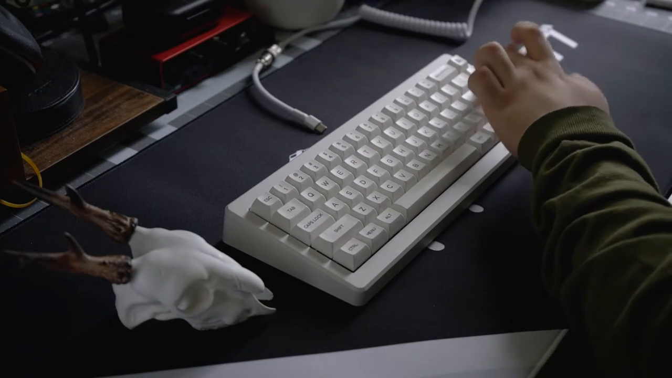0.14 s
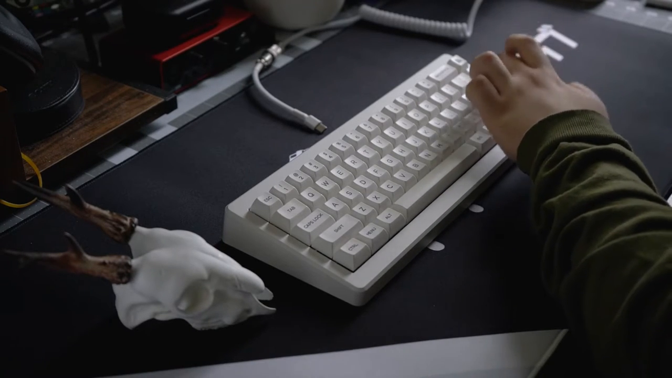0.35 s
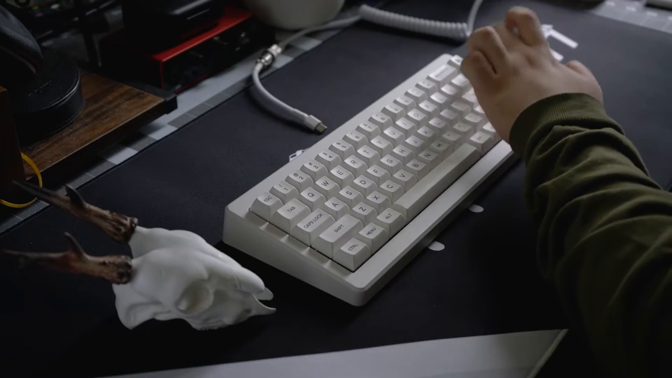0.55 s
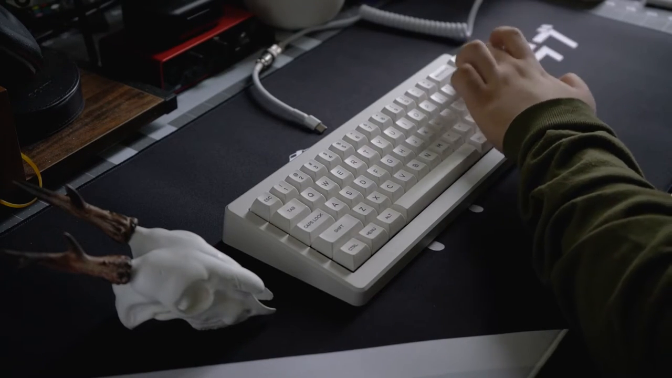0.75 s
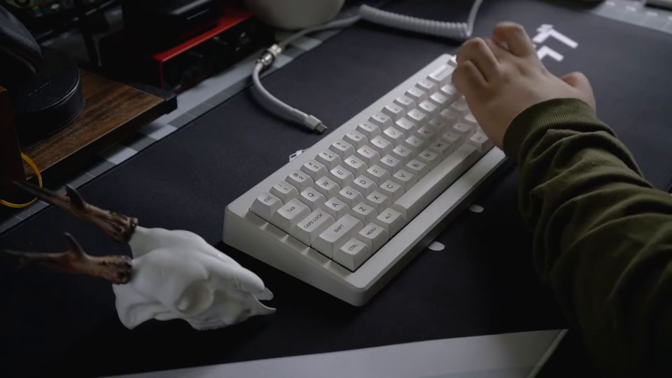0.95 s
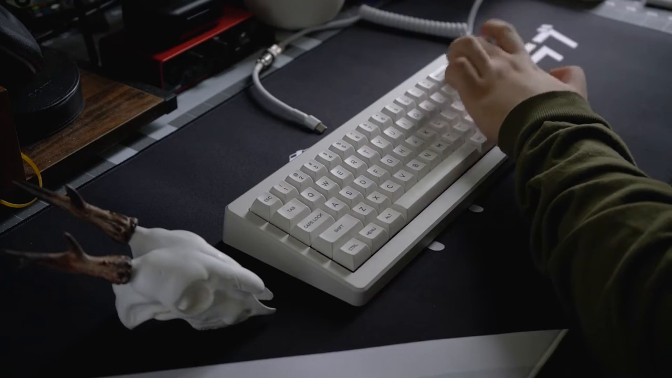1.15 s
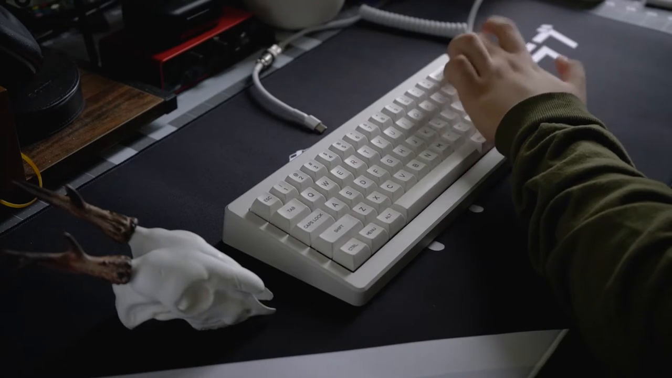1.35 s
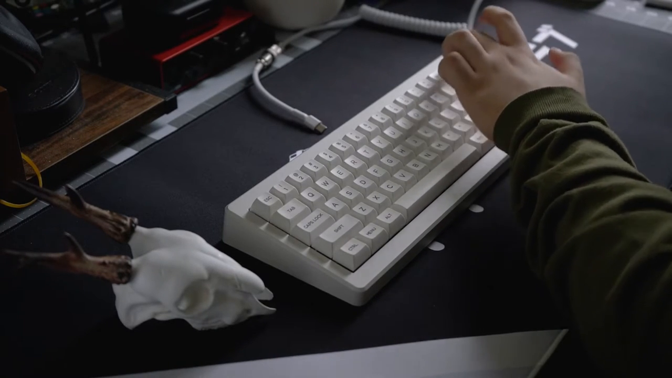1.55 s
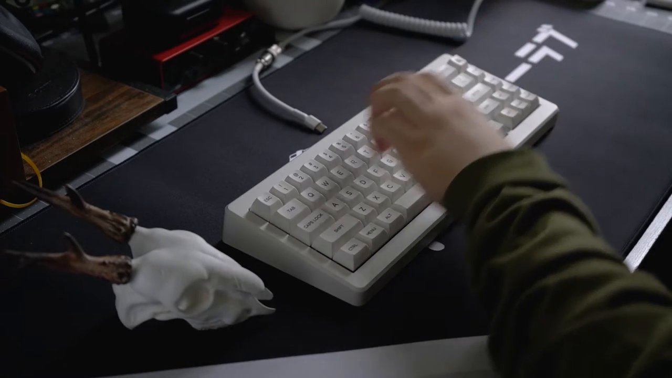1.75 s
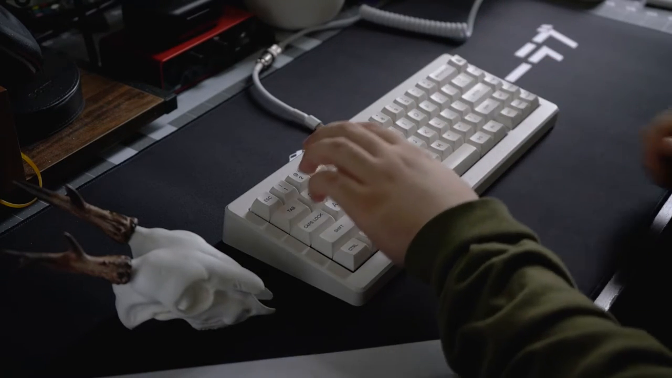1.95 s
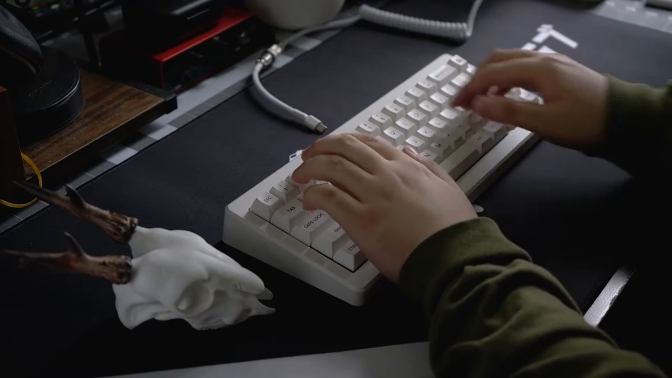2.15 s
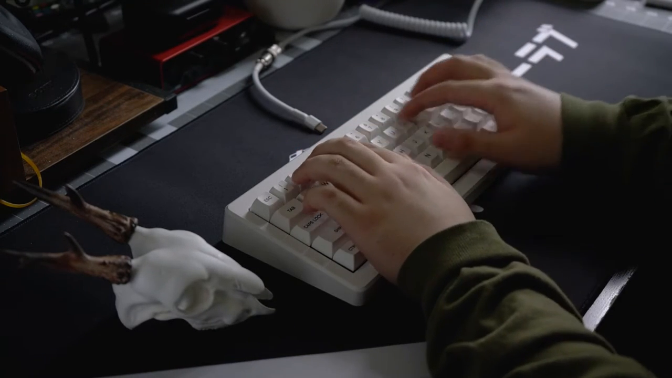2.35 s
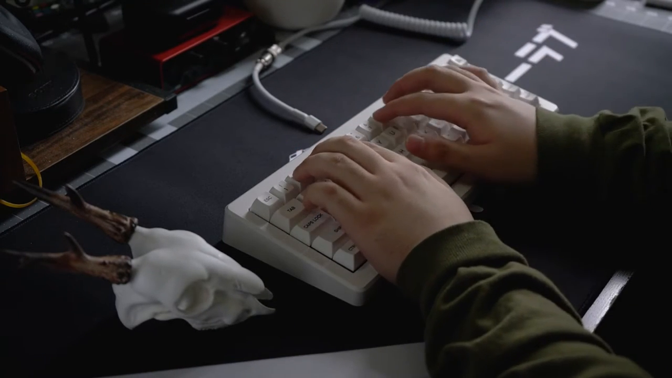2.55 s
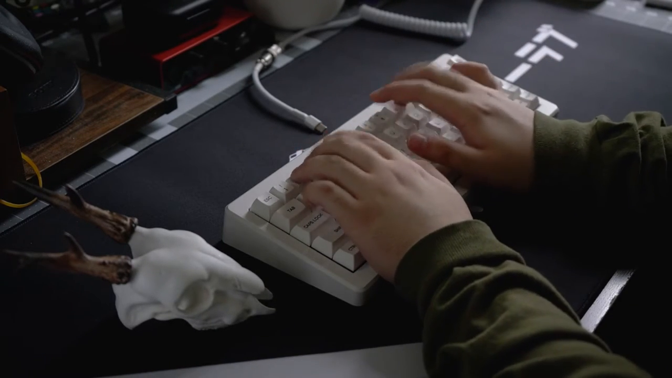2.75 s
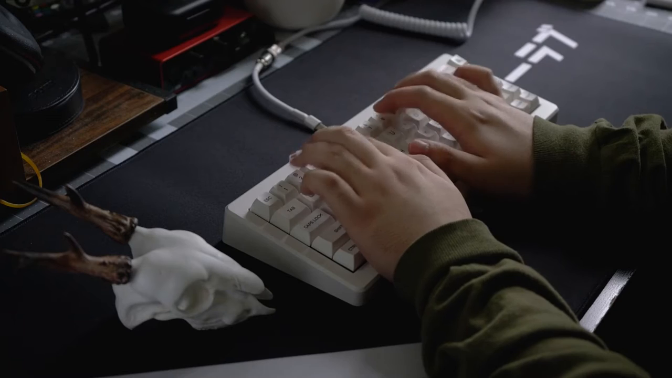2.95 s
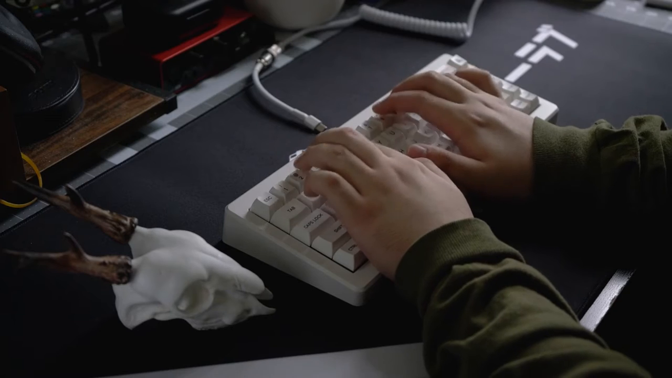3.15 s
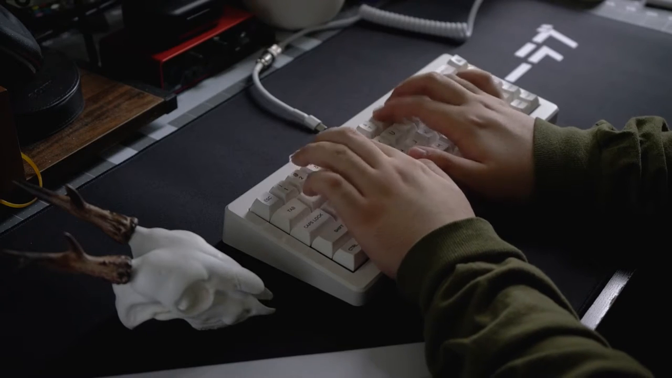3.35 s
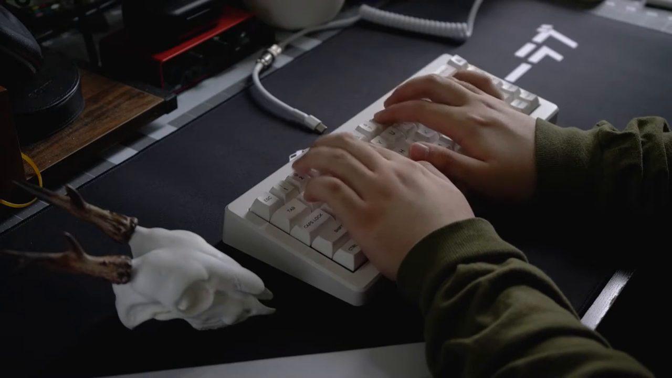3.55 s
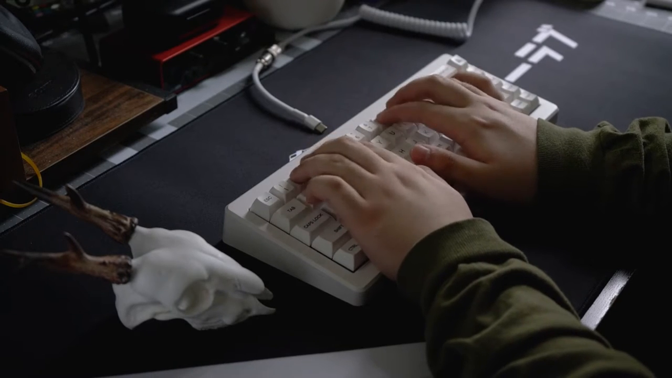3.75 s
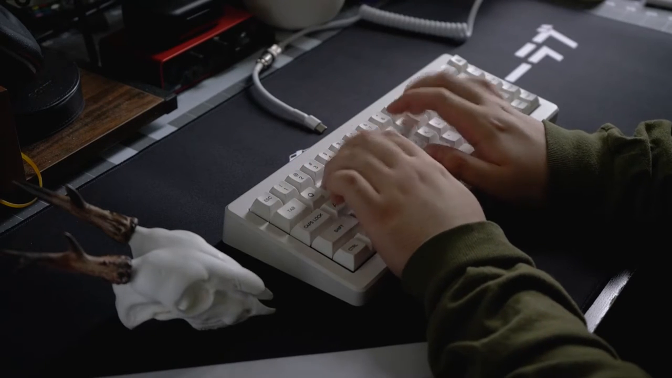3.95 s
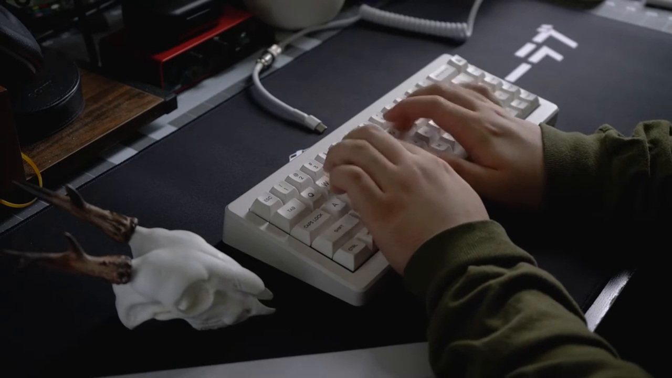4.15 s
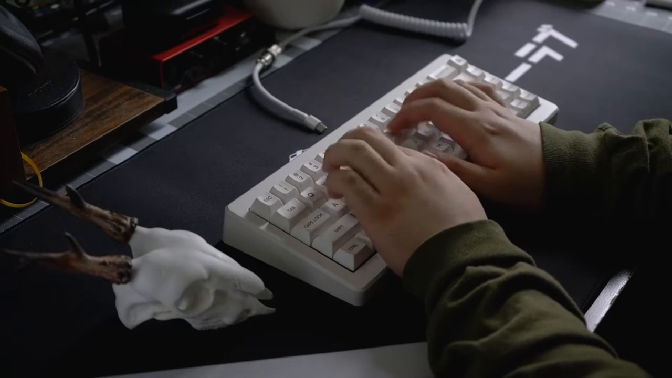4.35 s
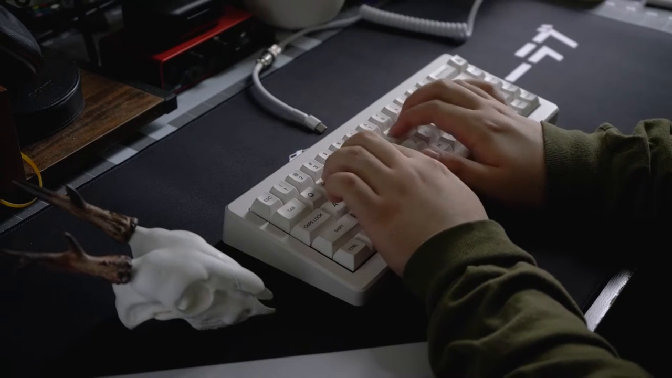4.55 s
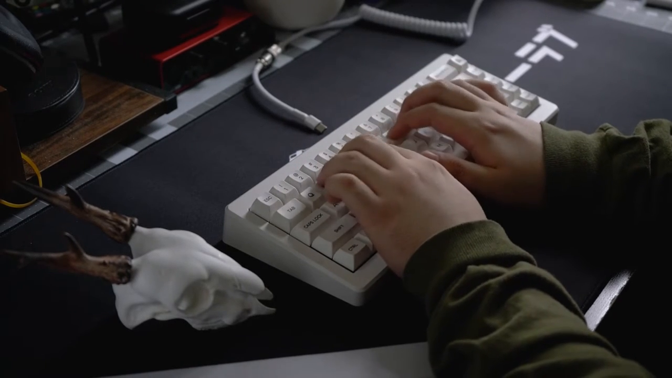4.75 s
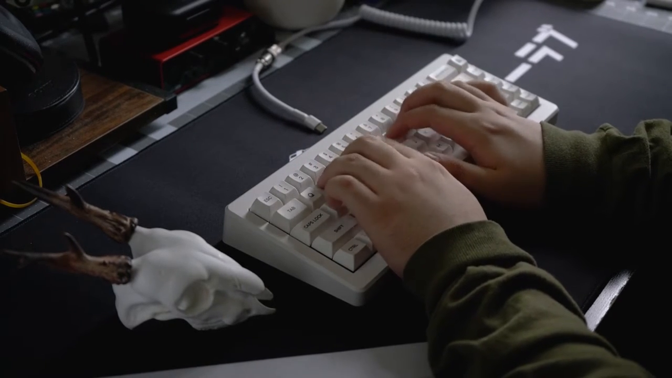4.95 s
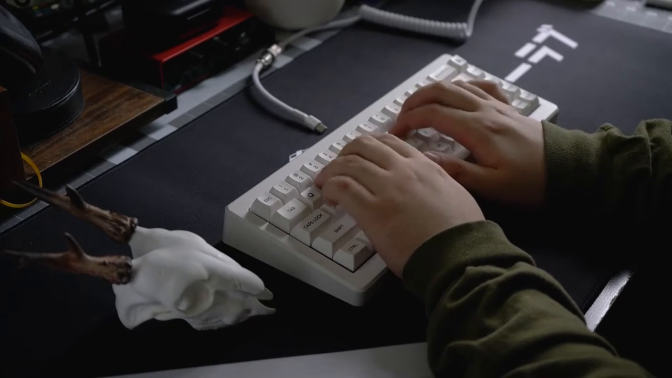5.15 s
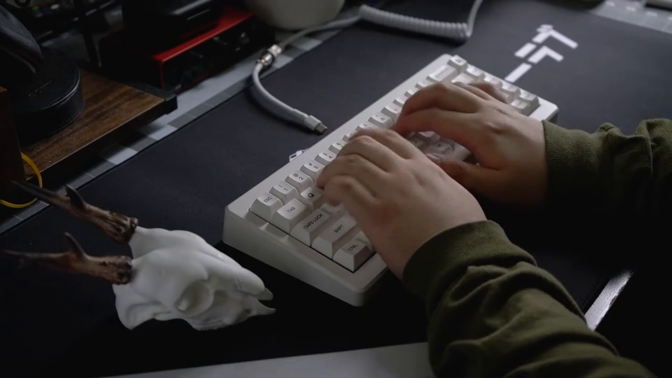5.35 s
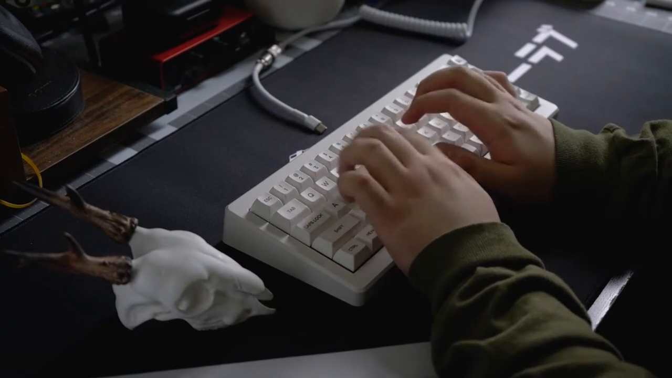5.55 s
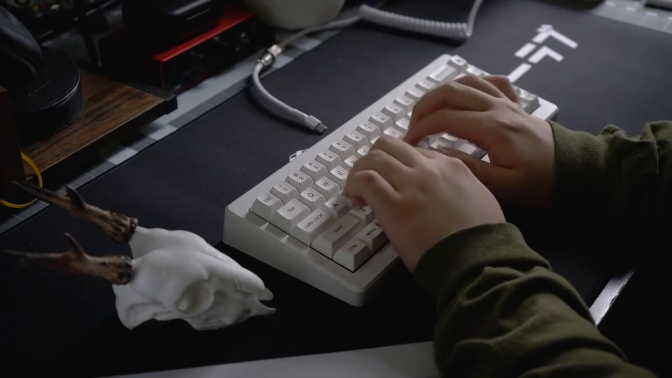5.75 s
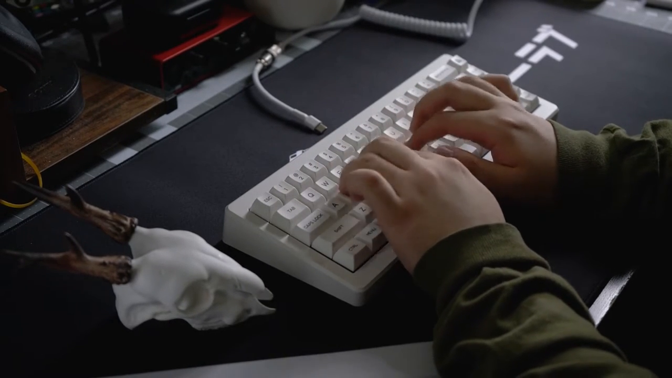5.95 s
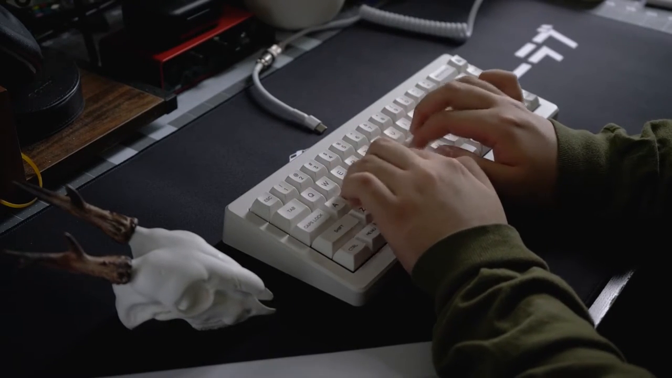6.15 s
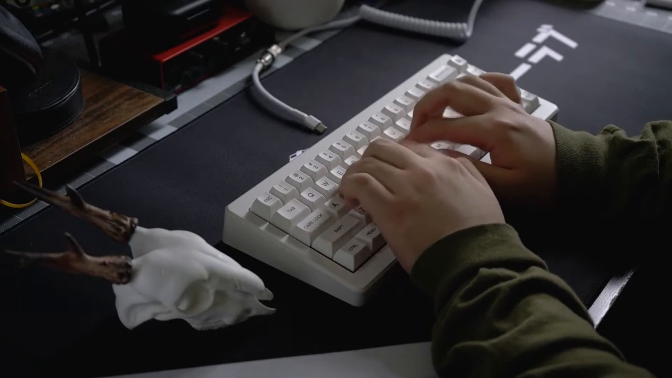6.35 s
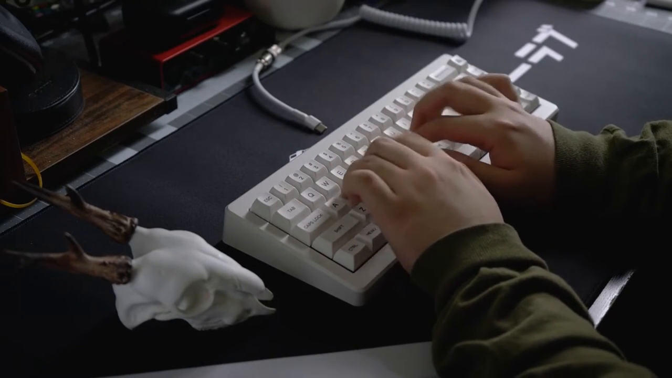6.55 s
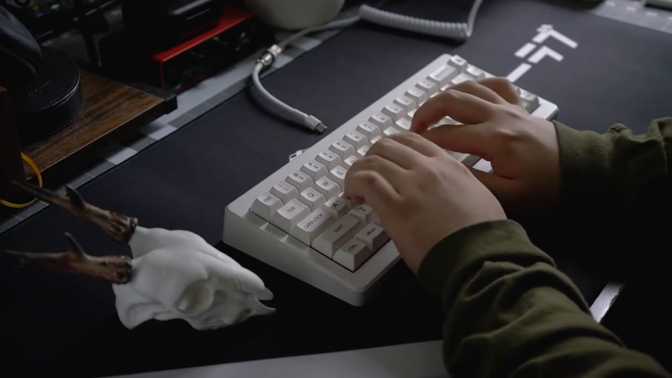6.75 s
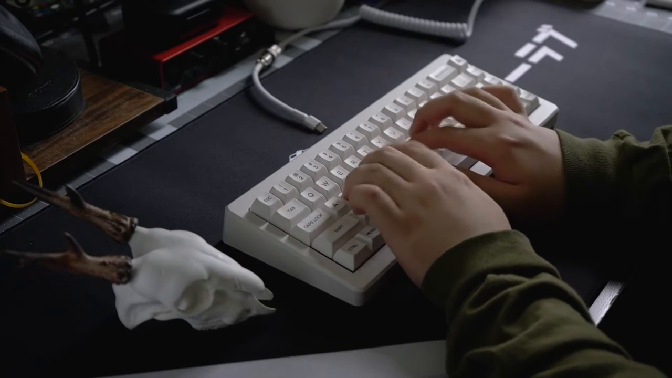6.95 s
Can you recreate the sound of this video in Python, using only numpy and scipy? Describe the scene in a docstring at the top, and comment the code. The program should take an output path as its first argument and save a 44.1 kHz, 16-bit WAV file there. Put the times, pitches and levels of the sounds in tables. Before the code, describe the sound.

A mechanical keyboard on a padded desk is heard close by in a small room. From about 0.2 to 1.7 seconds, three keys are tapped three times each. Every press gives a crisp clack with a soft low thud, a quieter click on release and a faint metallic ring of springs; the third key sounds thinner and sharper. Around 1.8 seconds a sleeve rustles very faintly, and the keys rest. At about 2.9 seconds both hands begin typing fast, with overlapping clicks and clacks, light chatter from returning keycaps and soft knocks of the case on its mat. The runs break briefly near 4.0 and 5.7 seconds, then continue, slightly heavier, until the end at about 7 seconds. A quiet, steady low rumble and a thin hiss lie underneath, and the room adds a short, light reverberation.

```python
"""Mechanical keyboard on a padded desk

Three keys are tried three times each, then both hands type in quick runs, close by in a small room.
Each landing and return of a key is an impact that excites damped modes of the case, keycap, stem and
switch housing. Stems rub as they travel, returning caps chatter, the springs ring in sympathy and the
case bobs on its mat. Beneath lie a low rumble, a thin hiss and a brief rustle of sleeves."""
import sys
import numpy as np
from scipy import signal
from scipy.fft import rfft, irfft, next_fast_len
from scipy.io import wavfile

SR = 44100
rng = np.random.default_rng(int(sys.argv[2]) if len(sys.argv) > 2 else 0)


def int16_out(signal):
    """Quantize to a 16-bit WAV file."""
    q = np.round(np.clip(np.atleast_2d(signal).T, -1, 1) * 32767)
    wavfile.write(sys.argv[1], SR, q.astype(np.int16))


N = 308700
CONTACT_TIME_S = np.arange(SR // 16) / SR


def amp(db):
    """Amplitude ratio of a level in decibels."""
    return 10 ** (np.asarray(db) / 20)


def unit(x):
    """Normalisation to rms 1."""
    return x / np.sqrt(np.mean(x ** 2) + 1e-20)


def burst(x):
    """Normalisation to the energy of five milliseconds at rms 1."""
    return x * np.sqrt(.005 * SR / (np.sum(x ** 2) + 1e-20))


def fade(t, t60):
    """Exponential decay by 60 dB in t60 seconds."""
    return np.exp(-np.log(1000) * t / t60)


def along(points, hz):
    """Interpolation of (frequency_hz, value) points on a logarithmic frequency axis."""
    frequencies, values = np.transpose(points)
    return np.interp(np.log(hz + 1), np.log(frequencies), values)


def add(track, start_s, sound):
    """Superposition of a sound on a track."""
    start = max(round(start_s * SR), 0)
    piece = sound[:max(N - start, 0)]
    track[start:start + len(piece)] += piece


def filtered(x, response):
    """Zero-phase filtering: the spectrum is multiplied by a function of frequency."""
    size = next_fast_len(N + SR // 2)
    return irfft(rfft(x, size) * response(np.fft.rfftfreq(size, 1 / SR)), size)[:N]


def noise(spectrum):
    """Spectral shaping of white noise, at rms 1."""
    return unit(filtered(rng.standard_normal(N), lambda hz: amp(along(spectrum, hz))))


def highpass(x, hz, order):
    """Causal attenuation below a cutoff."""
    return signal.sosfilt(signal.butter(order, hz, 'high', fs=SR, output='sos'), x)


# Relative spectra of the rumble and the hiss: frequency_hz, density_db
RUMBLE_SPECTRUM = [(20, -15.5), (32, 8), (50, -12), (80, -9), (125, -8.5), (190, -11.5), (280, -17),
                   (400, -20.5), (700, -40), (1500, -71)]
HISS_SPECTRUM = [(300, 4.5), (700, 3.5), (1000, 0.5), (1500, 0), (2600, -3.5), (3100, 2), (3600, -5.5),
                 (7000, -12.5), (11000, -19), (16000, -42)]
# Slow drift of the hiss: time_s, level_db
HISS_LEVELS = [(0, -60.5), (.6, -68.5), (1.3, -61.5), (1.8, -65), (2.85, -64), (4, -70.5), (7, -71)]


def background(rumble_db=-58):
    """The noise floor is broadband: a steady low rumble and a thin hiss that drifts in level."""
    hiss_db = np.interp(np.arange(N) / SR, *np.transpose(HISS_LEVELS))
    return amp(rumble_db) * noise(RUMBLE_SPECTRUM) + amp(hiss_db) * noise(HISS_SPECTRUM)


# Relative spectrum of rubbing cloth and skin: frequency_hz, density_db
SLEEVE_SPECTRUM = [(500, -22), (3000, 6), (5000, 1.5), (7500, 7), (11000, -1), (15000, -14)]
# Hand movements over the board: centre_s, half_width_s, level_db
HAND_SWEEPS = [(1.829, 0.14, -67), (2.332, .02, -81)]


def sleeve():
    """Friction noise swells and fades as the hands move to their typing position."""
    t = np.arange(N) / SR
    envelope = sum(amp(db) * np.exp(-((t - s) / half_s) ** 2) for s, half_s, db in HAND_SWEEPS)
    return envelope * noise(SLEEVE_SPECTRUM)


# Reverberation time of the room: frequency_hz, t60_s
ROOM_DECAY = [(500, 0.61), (3000, 0.364), (10000, 0.2), (16000, 0.079)]


def room(keys, near_db=-14, near_t60=0.2, far_db=-18):
    """Reverberation: objects on the desk scatter the clicks; the walls answer softer and longer."""
    hz, t, spectra = signal.stft(rng.standard_normal(SR // 2), SR, nperseg=256)
    far = signal.istft(spectra * fade(t, along(ROOM_DECAY, hz)[:, None]), SR, nperseg=256)[1]
    near = rng.standard_normal(len(far)) * fade(np.arange(len(far)) / SR, near_t60)
    response = amp(near_db) * near / np.linalg.norm(near) + amp(far_db) * far / np.linalg.norm(far)
    reflections = signal.fftconvolve(keys, np.pad(response, (SR // 350, 0)))[:N]
    colour_db = [(500, -7), (1000, -1.5), (3000, -5.5), (7000, -2.0), (11000, -10.5), (16000, -4.5)]
    return filtered(reflections, lambda f: amp(along(colour_db, f)))


def desk(blows, thud_db, hz, t60=0.15, rise_s=0.0015):
    """A damped mass on a spring: the heavy case bobs on the mat at each (start_s, force_db) blow."""
    t = np.arange(SR // 5) / SR
    rise = (1 - np.exp(-t / rise_s)) ** 2
    track = np.zeros(N)
    for (start_s, force_db), detune in zip(blows, rng.standard_normal(len(blows))):
        bob = -np.sin(2 * np.pi * hz * np.exp(0.12 * detune) * t) * rise * fade(t, t60)
        add(track, start_s, amp(force_db + thud_db) * bob / np.abs(bob).max())
    return track


# Resonances of the steel switch springs: pitch_hz, relative_level_db
SPRING_MODES = [(2880, -3), (4330, -8), (7400, 2), (9500, -6), (10500, -4.5)]


def springs(keys, spring_db=-23, t60=1.25, width_hz=230, log_reach=0.076):
    """Sympathetic resonance: many slightly unlike springs store click energy near their own pitch."""
    retained = fade(1 / SR, t60) ** 2  # share of the energy left after one sample
    shimmer = np.zeros(N)
    for hz, db in SPRING_MODES:
        drive = filtered(keys, lambda f: np.exp(-(np.log((f + 1) / hz) / log_reach) ** 2))
        energy = signal.lfilter([1 - retained], [1, -retained], drive ** 2)
        cluster = filtered(rng.standard_normal(N), lambda f: 1 / (1 + ((f - hz) / width_hz) ** 2))
        shimmer += amp(db + spring_db) * np.sqrt(energy) * unit(cluster)
    return shimmer


def ring(hz, db, t60, scatter_cycles=1, rise_cycles=0.34, contact_s=.0001):
    """Free vibration: one damped sine per mode, its energy set by db; low modes build up slowly."""
    # neighbouring modes start in antiphase, give or take the scatter
    phase_cycles = np.arange(len(hz)) / 2 + scatter_cycles * (rng.random(len(hz)) - .5)
    hz, t60 = hz[:, None], t60[:, None]
    swing = np.sin(2 * np.pi * (hz * CONTACT_TIME_S + phase_cycles[:, None]))
    rise = 1 - np.exp(-CONTACT_TIME_S / (contact_s + rise_cycles / hz))
    return amp(db)[:, None] * swing * rise * fade(CONTACT_TIME_S, t60) / np.sqrt(t60)


def parts(hz, db, t60, scatter_cycles=1, edges_hz=(1700, 5000, 8500)):
    """Modal sums in four bands of equal energy, the parts: case, keycap, stem and housing."""
    waves = ring(hz, db, t60, scatter_cycles)
    owner = np.searchsorted(edges_hz, hz)
    return np.array([burst(waves[owner == part].sum(0)) for part in range(4)])


def strike(waves, levels_db):
    """An impact excites all four parts at once, each at its own level."""
    return sum(amp(db) * burst(wave) for wave, db in zip(waves, levels_db))


# Strength of the keyboard's dense modes: frequency_hz, relative_level_db
BOARD_SPECTRUM = [(560, -26), (720, 8.5), (860, -2), (1000, 4), (1340, 2), (1570, -5.5), (1840, -6.5),
                  (3200, -2), (4200, -6.5), (4900, -14), (5600, -21.5), (7300, -11.5), (8300, -22),
                  (10000, -4.5), (12500, -19), (16000, -23.5)]
# Their damping: frequency_hz, t60_s
BOARD_DECAY = [(700, 0.025), (1400, 0.03), (3000, 0.014), (6000, 0.012), (11000, 0.013)]


def board_parts(count=72, scatter_db=3, low_hz=560, high_hz=16000):
    """Modal excitation depends on the spot struck, so each blow draws a new mix of dense modes."""
    hz = low_hz * (high_hz / low_hz) ** ((np.arange(count) + rng.random(count)) / count)
    levels_db = along(BOARD_SPECTRUM, hz) + scatter_db * rng.standard_normal(count)
    return parts(hz, levels_db, along(BOARD_DECAY, hz))


def stem_friction(blows, slide_db=-22, lead_s=0.0045, travel_db=-11, travel_s=.014):
    """Sliding friction of the stem in its housing grows until the moment of impact."""
    before_s = CONTACT_TIME_S[::-1]
    swell = np.exp(-before_s / lead_s) + amp(travel_db) * np.exp(-before_s / travel_s)
    effort = np.zeros(N)
    for impact_s, levels_db, *_ in blows:
        add(effort, impact_s - len(swell) / SR, amp(levels_db[0]) * swell)
    return amp(slide_db) * effort * noise(BOARD_SPECTRUM)


def cap_rattle(lifts, bounce_db=-10, spread_db=3.5, gap_s=.0028, count=3, cut_hz=636):
    """Repeated impact: with no finger to hold it, a returning cap bounces against the top stop."""
    balance_db = np.array([-4, -2.5, 4.5, -7])  # the stem is emphasised
    track = np.zeros(N)
    for start_s, levels_db in lifts:
        gaps_s = gap_s * (.5 + rng.random(count))
        sizes_db = spread_db * rng.standard_normal(count)
        waves = board_parts()
        for delay_s, size_db in zip(np.cumsum(gaps_s), sizes_db):
            add(track, start_s + delay_s, strike(waves, levels_db + bounce_db + size_db + balance_db))
    return highpass(track, hz=cut_hz, order=5)


# Gain of case, keycap, stem and housing in dB per dB of touch. Force is the weight of the blow,
# body how strongly the spot struck moves the case, snap how sharply the housing clicks.
FORCE_SLOPE = np.array([0.58, 1.2, 1.33, 0.85])  # the heavy case varies least
BODY_SLOPE = np.array([1, 0, 0, 0])
SNAP_SLOPE = np.array([0.14, 0.13, 0.67, 0.92])

# Three keys pressed singly, and let go: start_s, key_number, force_db, snap_db
TAP_LANDINGS = [(0.1571, 0, 3.5, 1), (0.3011, 0, -1.5, 0.5), (0.455, 0, 0.5, 0.5), (0.7165, 1, 4.5, 1),
                (0.8661, 1, -3, 0), (1.0241, 1, -2, 2), (1.2717, 2, 5, 0.5), (1.4177, 2, 2.5, -1.5),
                (1.56, 2, 1.5, 2)]
TAP_RELEASES = [(0.2315, 0, 2.5, -.5), (0.3845, 0, 3, 0), (0.547, 0, 0, -1), (0.7913, 1, 1.5, -1.5),
                (0.9454, 1, -1.5, 1.5), (1.1095, 1, -1.5, -1), (1.342, 2, 2, 1), (1.494, 2, -.5, 0),
                (1.6554, 2, -1, -.5)]
# Base levels on landing and on release, one row per key: case_db, keycap_db, stem_db, housing_db
TAP_LANDING_LEVELS = [(-33, -29.5, -40.5, -34.5), (-30, -29, -38.5, -32.5), (-31.5, -37, -34, -23.5)]
TAP_RELEASE_LEVELS = [(-40.5, -46, -56.5, -46.5), (-37, -47, -51.5, -41), (-49, -50.5, -57, -48.5)]


def tap_contacts(taps, base_db):
    """Excitation of a single key: force scales all parts alike, snap mainly the stem and housing."""
    return [(start_s, key, np.add(base_db[key], force_db) + snap_db * SNAP_SLOPE)
            for start_s, key, force_db, snap_db in taps]


# Modes of the three keys: pitch_hz, relative_level_db, t60_s
FIRST_KEY_MODES = [(938, 2, 0.012), (1010, 1, 0.017), (1390, -11.5, 0.025), (1820, 2.5, 0.029),
                   (2500, 6, 0.025), (3070, 7.5, 0.0046), (3710, -0.5, 0.042), (4180, 9, 0.011),
                   (6500, -14, 0.012), (7500, -10, 0.0034), (10000, -6, 0.0053), (10430, -8, 0.016),
                   (10960, -8, .006), (13410, -17.5, .004)]
SECOND_KEY_MODES = [(906, 1.5, 0.018), (1010, 3, 0.02), (1390, -7, .02), (1460, -1.5, 0.015),
                    (2500, 5, 0.023), (2870, -0.5, 0.024), (3570, 2, 0.01), (4090, 5, 0.0049),
                    (5850, -5.5, 0.008), (6840, 1.5, 0.0028), (9540, -3.5, 0.013), (10900, -7.5, 0.0086),
                    (13100, -10.5, .004)]
THIRD_KEY_MODES = [(910, -15, .018), (1010, -13, 0.043), (1500, -13, 0.013), (1920, -22, .008),
                   (2530, -19, .016), (3860, -10.5, 0.0064), (4210, -16, 0.0017), (6330, 1, 0.005),
                   (7700, -11, 0.0044), (9000, -4.5, 0.0022), (10500, -9, .007), (11080, -2, 0.0055),
                   (11600, -7, .005), (13100, -13.5, 0.0047), (14940, -21, .003)]


def single_keys(taps, dense_db=-9, knock_db=-26):
    """Natural frequencies belong to the key and recur at each tap; the board's faint answer varies."""
    keys = [parts(*np.transpose(modes), scatter_cycles=.2)
            for modes in (FIRST_KEY_MODES, SECOND_KEY_MODES, THIRD_KEY_MODES)]
    track = np.zeros(N)
    for start_s, key, levels_db in taps:
        add(track, start_s, strike(keys[key] + amp(dense_db) * board_parts(), levels_db))
    # the small case radiates little below its first modes
    return highpass(track, hz=760, order=5) + amp(knock_db) * highpass(track, hz=378, order=3)


# Keys landing while typing: start_s, force_db, body_db, snap_db, case_hz, keycap_hz
KEYSTROKES = [(2.8858, 1.5, 2, 2, 1264, 2670), (2.8992, -1, -5, -2, 1340, 2630),
              (2.9049, 2, 2.5, 9, 1347, 2930), (2.9829, 5.5, 1.5, 3, 1320, 2476),
              (3.0852, 2, 1, 4.5, 1280, 2590), (3.0929, 0.5, -8, 6, 744, 2520),
              (3.115, -1.5, 3.5, 2.5, 1410, 2880), (3.1326, 1, 0.5, 0, 1340, 2920),
              (3.195, 1, 0, 3, 1310, 2463), (3.2684, 2, -2, 5.5, 730, 2620),
              (3.2759, 0.5, -1, 7, 1190, 2600), (3.3193, -3, -4.5, -1.5, 1400, 2590),
              (3.3264, -3, 0.5, -2, 1307, 2760), (3.4008, 3.5, -0.5, 2.5, 1500, 2500),
              (3.4532, 2.5, -1.5, 2.5, 704, 2534), (3.4612, -2, -3.5, 7.5, 1410, 2590),
              (3.5016, -1.5, -1, 3.5, 1280, 2850), (3.5291, -3.5, 0.5, 1.5, 1370, 2560),
              (3.5428, -0.5, 1.5, 1.5, 1440, 2590), (3.5502, -7, 2, -1, 1470, 2410),
              (3.6283, 6.5, -0.5, 2, 720, 2580), (3.6322, 1, -2, 8, 760, 2800),
              (3.686, -1, 2.5, 5.5, 1320, 2870), (3.7865, 0.0, -3, 0, 1120, 2700),
              (3.79, 0.5, 1.5, 0, 1250, 2500), (3.8027, 0.5, -1, 3.5, 1180, 2820),
              (3.8612, 4.5, -1, 3, 1370, 2550), (4.102, 1.5, 0, -4.5, 1390, 3650),
              (4.1088, 0, -2.5, -5.5, 965, 3140), (4.1869, 0, 3.5, -3, 1006, 3240),
              (4.1927, -0.5, 3, -1, 980, 2380), (4.2925, 0, -2, 3, 760, 3740),
              (4.2968, -0.5, 2, 4.5, 780, 1945), (4.313, -2.5, 4.5, -3, 1010, 2430),
              (4.3355, 1, 1.5, -8, 910, 3100), (4.3459, -3.0, 1.5, 2, 725, 2460),
              (4.3764, -5.5, 2.5, 0, 970, 2620), (4.4062, 2, -5.5, 9.5, 870, 3170),
              (4.4097, -1, 1, -1, 975, 3170), (4.4294, -6, -0.5, 6, 970, 2700),
              (4.4647, 1.5, -2.5, 2.5, 700, 3880), (4.469, -1, -0.5, 5, 750, 3130),
              (4.5213, -5, 0.5, -4, 850, 1850), (4.5602, 2.5, -0.5, -3, 1375, 3460),
              (4.6388, -1.5, 0, 1.5, 985, 3670), (4.646, -3.5, 0.5, 0, 994, 2820),
              (4.7097, -4.5, 0.5, 0.5, 1001, 3330), (4.7671, -7.5, 2.5, 3, 716, 1850),
              (4.8057, -5, -4, -8, 1010, 2880), (4.8244, -3.5, -1.5, 2.5, 1300, 1850),
              (4.8541, 0, 3, 3, 987, 3320), (4.8733, 0.5, -0.5, -7, 930, 3280),
              (5.0141, -5.5, 1, 4, 1110, 3250), (5.0183, 1.5, -5, -12.5, 1070, 3060),
              (5.0711, -2.5, 0.5, -3, 1040, 3360), (5.1033, -5, 1, -6, 979, 3070),
              (5.2157, -3.5, -1, 5, 760, 3720), (5.2273, -1.5, 0, 2.5, 760, 1850),
              (5.2484, 5.0, -1, -5, 1234, 3080), (5.261, -4.5, 0, -8, 990, 3150),
              (5.3372, 1, -2.5, -2, 790, 3500), (5.433, 1, -1.5, 5, 710, 2040),
              (5.442, 2, 3.5, 2.5, 1360, 3380), (5.4631, 7, 2, -0.5, 1330, 3220),
              (5.4695, 5, -7, -11, 790, 3270), (5.4883, -4.5, 3, 2, 1010, 2810),
              (5.5493, 3.5, 0, 0, 740, 3215), (5.7426, -1.5, 1, -3.5, 800, 3030),
              (5.7674, -3.5, -2, -14, 1030, 2700), (5.7822, -4, -7, -4, 760, 3160),
              (5.7911, 2.5, 2.5, 2, 1010, 3510), (5.8684, 2, 1, -3.5, 974, 1960),
              (5.9462, 3, 1, -5.5, 1194, 3040), (6.0035, 1, -6, -9.5, 1010, 1990),
              (6.0806, 3.5, 1, -3, 1008, 1914), (6.1436, 1.5, 0, -4.5, 980, 2320),
              (6.1635, -3.0, 0, -5, 980, 2360), (6.1994, 8, -1.5, -5.5, 1360, 1810),
              (6.2125, 0, -9, -8, 761, 1940), (6.295, 4, 1.5, -0.5, 1030, 1850),
              (6.3389, 1.5, 0.5, -3, 1260, 2460), (6.4046, 0.5, 6, -4, 970, 3240),
              (6.4191, 9.5, -4, -8.5, 1026, 1950), (6.5082, 4.5, 1.5, -5, 784, 1916),
              (6.5556, 4.5, 0, -4.5, 1390, 3130), (6.57, -3.5, -8, -2, 732, 1890),
              (6.611, -2.5, 4.5, -12, 1010, 3280), (6.6325, 7.0, -2, -6, 1260, 1850),
              (6.7198, 5, 0.5, -2.5, 1020, 1868), (6.7614, 5, 4, -2.5, 1280, 3270),
              (6.7816, 0, -2, -3, 990, 2350), (6.8383, 3.0, 4, -1.5, 1010, 1840),
              (6.8662, 8, -0.5, -4, 1325, 1820), (6.878, -0.5, -4, -11, 1270, 2460),
              (6.9571, 5, 2, -1.5, 814, 3290)]


def landings(base_db=(-31.5, -29.5, -42.5, -35)):
    """Impact on the bottom stop: each part's amplitude follows a power law in force, body and snap."""
    slopes = np.array([FORCE_SLOPE, BODY_SLOPE, SNAP_SLOPE])
    return [(start_s, base_db + np.dot(touch_db, slopes), case_hz, cap_hz)
            for start_s, *touch_db, case_hz, cap_hz in KEYSTROKES]


def rebounds(base_db=(-44.5, -50, -59.5, -62), after_s=0.01, spread_s=.0015):
    """Secondary impact: a dull knock follows every landing as the case settles."""
    delays_s = after_s + spread_s * rng.standard_normal(len(KEYSTROKES))
    return [(start_s + delay_s, np.add(base_db, force_db / 2), case_hz, cap_hz)
            for (start_s, force_db, *_, case_hz, cap_hz), delay_s in zip(KEYSTROKES, delays_s)]


# Keys springing back while typing: start_s, force_db, chatter_db
KEY_RELEASES = [(2.9472, -3, 2), (2.9966, -8, 9), (3.018, -3.5, 8), (3.0417, -0.5, 2.5), (3.168, 0.5, 5),
                (3.2314, -0.5, 8), (3.2406, -5, -8), (3.312, -2.0, 11), (3.3557, -3.0, 6.5),
                (3.372, 1.5, -17), (3.4118, -5, 8), (3.4395, 0, 0), (3.592, 2, -3), (3.6707, -6, 2),
                (3.7191, -1.0, 3), (3.728, -9, -8), (3.7509, 1, 2), (3.7607, 1, 1), (3.903, 0, 1),
                (3.9113, -7, 5), (3.9201, -1.5, -8), (3.9315, -7.5, -9), (3.9503, 1.5, 2),
                (3.9748, -3.5, -2), (4.2225, -2.5, 6), (4.2286, 2, -1), (4.4395, 3, 0), (4.5275, -1, -4),
                (4.5683, -11, -1), (4.6108, 0.5, 5), (4.6799, -5, 4), (4.7414, 0, 4), (4.75, -2, -8),
                (4.7725, 2, -11), (4.836, -4.5, -3), (4.9176, -5, -6), (4.9371, -0.5, -1), (4.9536, 0, -11),
                (4.9789, 2.5, -7), (5.0312, 0.5, 6), (5.1338, 1, -1), (5.14, -2.5, -13), (5.1564, -1, -13),
                (5.183, 1.5, -1), (5.2751, -1, 9), (5.2826, -2.5, -8), (5.3485, -0.5, 4), (5.3704, 2.0, 3),
                (5.4006, 5.5, -4), (5.5637, -1.0, -1), (5.5768, -3.0, 2), (5.5914, 2, 0),
                (5.6043, 3.5, 4.5), (5.6104, -7, -4), (5.6453, 0, 7), (5.84, -4.5, -3), (5.8981, 1, 1),
                (5.9037, 1, 3), (5.9593, 3, -9), (5.9842, 6.0, 1.5), (5.9966, 4.5, -5), (6.0519, -0.5, -12),
                (6.059, -1, -13), (6.0997, 4.5, -2), (6.1079, 0, 0), (6.18, 3.0, -10), (6.245, -0.5, -3),
                (6.26, -2.5, -4), (6.3062, 0, 0), (6.3194, 2, -3), (6.4468, 0, 7), (6.4645, -4, -8),
                (6.5331, 4, -7), (6.543, 0, -4), (6.6194, 1, -5), (6.6679, 0.5, -8), (6.939, 3.5, 2),
                (6.9754, 5.5, 2), (6.9824, -11, -6)]


def releases(base_db=(-37, -44.5, -60, -46), held_s=0.071, snap_kept=0.31, free_cap_hz=(1850, 2620)):
    """Impact on the top stop: the case rings as at an earlier landing, the freed cap at its own note."""
    landed_s = np.array(KEYSTROKES)[:, 0]
    cap_notes_hz = rng.choice(free_cap_hz, len(KEY_RELEASES))
    blows = []
    for (start_s, force_db, _), cap_hz in zip(KEY_RELEASES, cap_notes_hz):
        landing = max(np.searchsorted(landed_s, start_s - held_s) - 1, 0)
        snap_db, case_hz = KEYSTROKES[landing][3:5]
        levels_db = np.add(base_db, force_db) + snap_kept * snap_db * SNAP_SLOPE
        blows.append((start_s, levels_db, case_hz, cap_hz))
    return blows


def brushes(lifts, after_s=.012, spread_s=.014, share=.25, graze_db=-8.5):
    """Glancing impact: some lifting fingers graze a neighbouring cap."""
    draws = rng.random((len(lifts), 2))
    return [(start_s + after_s + spread_s * late, levels_db + graze_db, *notes_hz)
            for (start_s, levels_db, *notes_hz), (late, chance) in zip(lifts, draws) if chance < share]


def typing(blows, case_db=-2.5, cap_db=-2, housing_db=-3, housing_hz=9810, spread_hz=330):
    """Modal superposition: a leading note in case, keycap and housing stands over the dense modes."""
    track = np.zeros(N)
    lead_t60 = np.array([.026, .015, .009])
    for start_s, levels_db, case_hz, cap_hz in blows:
        click_hz = housing_hz + spread_hz * rng.standard_normal()  # the switches are nearly alike
        notes_hz = np.array([case_hz, cap_hz, click_hz])
        case, cap, housing = map(burst, ring(notes_hz, np.zeros(3), lead_t60))
        silent_stem = np.zeros_like(cap)
        lead = np.array([amp(case_db) * case, amp(cap_db) * cap, silent_stem, amp(housing_db) * housing])
        dense = board_parts()
        # one blow drives both, so the note swings with its neighbours
        polarity = np.sign(np.sum(dense * lead, axis=1, keepdims=True))
        add(track, start_s, strike(dense + polarity * lead, levels_db))
    return highpass(track, hz=601, order=6)


def scene(resting_hands_db=-13, desk_snap_slope=-0.27):
    """Sound pressures add: keys, springs, desk and room sum at one listening point."""
    ambience = background() + sleeve()
    # single presses carry more of the arm's weight; a sharp click passes less weight to the desk
    tap_loads = [(s, force_db) for s, _, force_db, _ in TAP_LANDINGS]
    run_loads = [(s, force_db + desk_snap_slope * snap_db) for s, force_db, _, snap_db, *_ in KEYSTROKES]
    thuds = desk(tap_loads, thud_db=-41, hz=61.4, t60=0.14) + desk(run_loads, thud_db=-48.5, hz=63)

    tap_downs = tap_contacts(TAP_LANDINGS, TAP_LANDING_LEVELS)
    tap_ups = tap_contacts(TAP_RELEASES, TAP_RELEASE_LEVELS)
    downs, ups = landings(), releases()
    rub = stem_friction([(s, levels_db) for s, _, levels_db in tap_downs + tap_ups] + downs + ups)
    tap_lifts = [(s, levels_db) for s, _, levels_db in tap_ups]
    run_lifts = [(s, levels_db + chatter_db)
                 for (s, levels_db, *_), (*_, chatter_db) in zip(ups, KEY_RELEASES)]
    chatter = cap_rattle(tap_lifts, bounce_db=-8.5, gap_s=.0022, count=2, cut_hz=1400)
    chatter += cap_rattle(run_lifts)
    singles = single_keys(tap_downs + tap_ups)
    runs = typing(downs + ups + rebounds() + brushes(ups))
    keys = singles + runs + rub + chatter
    shimmer = springs(singles + amp(resting_hands_db) * runs)  # resting hands quieten the springs
    return (keys + shimmer + room(keys) + thuds + ambience)[None]


def record(dry):
    """Band limiting: an ideal low-pass filter removes the highest treble."""
    top_hz = 16700
    return np.array([filtered(channel, lambda hz: hz < top_hz) for channel in dry])


dry = scene()
out = record(dry)
int16_out(out)
```